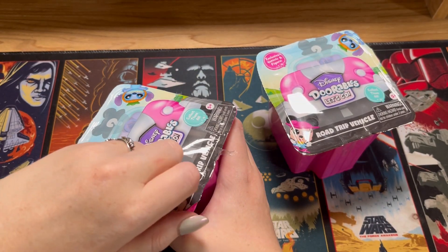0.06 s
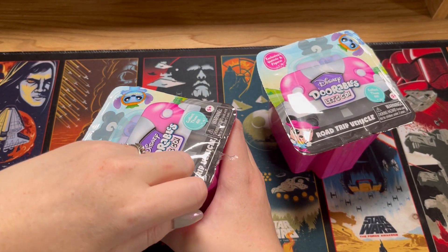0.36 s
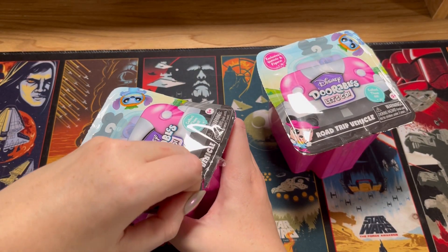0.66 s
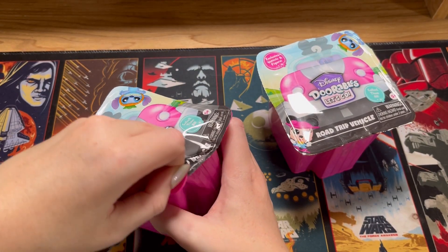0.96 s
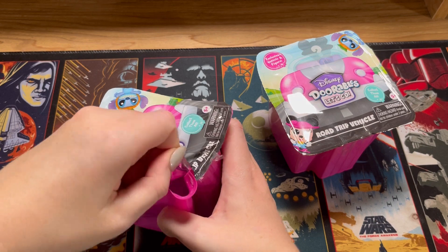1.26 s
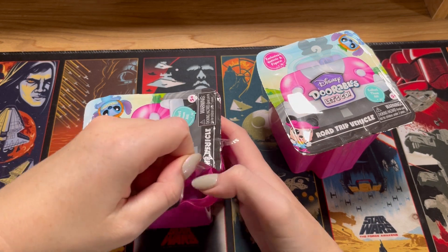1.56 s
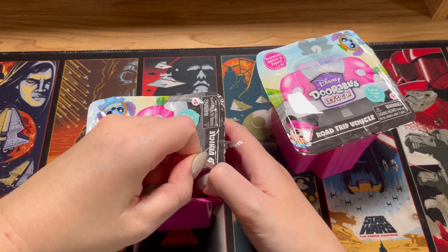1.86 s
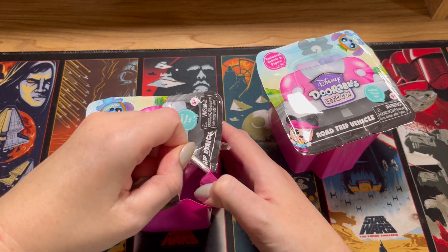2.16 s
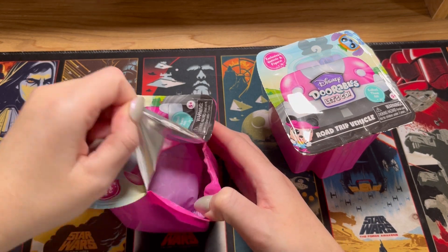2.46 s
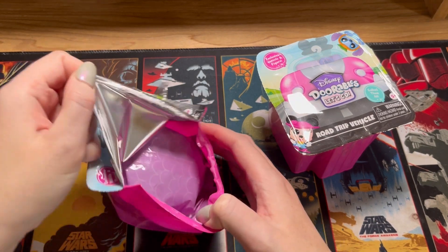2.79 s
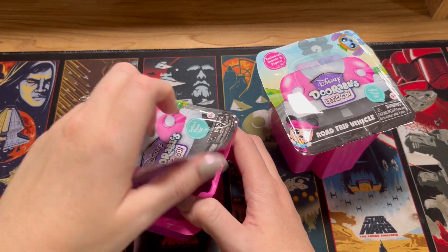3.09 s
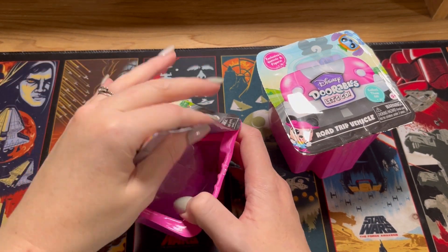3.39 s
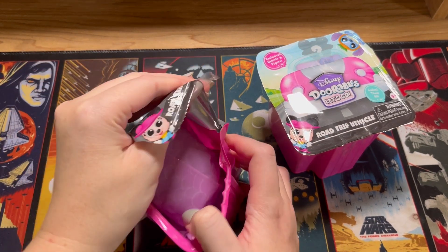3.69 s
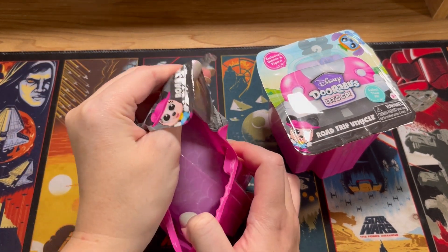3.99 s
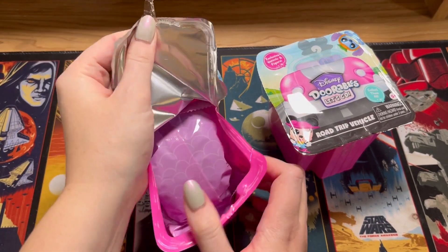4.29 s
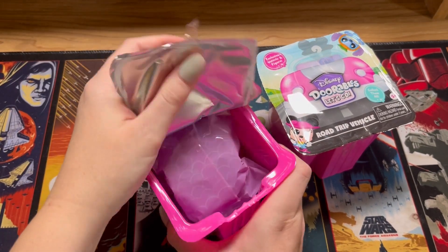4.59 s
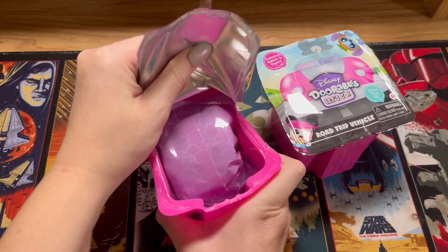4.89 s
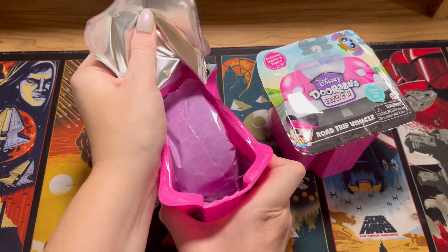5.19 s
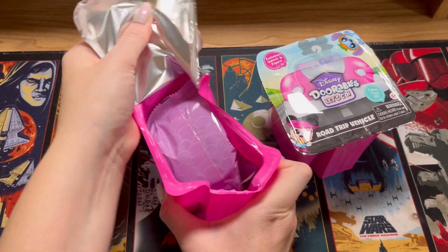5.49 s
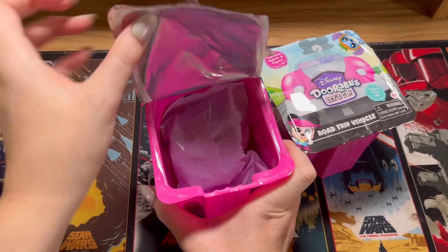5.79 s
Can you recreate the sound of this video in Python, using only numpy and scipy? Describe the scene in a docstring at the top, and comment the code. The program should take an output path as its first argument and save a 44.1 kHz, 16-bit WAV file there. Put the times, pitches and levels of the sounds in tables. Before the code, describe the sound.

Close to the microphone in a small dry room, a foil lid is peeled off a hand-held plastic tub. Light, scattered clicks come first, then the seal gives way in louder bursts of sharp, slightly hollow snaps. Between them the foil crinkles and the tub creaks, with soft low thumps and a faint rumble from the hands.

```python
"""A small dry room: close to the microphone, a foil lid is peeled off a hand-held plastic tub.
The seal lets go in jerks; each snap runs through the lid and the hollow tub.
In between, the bent foil crinkles and the tub creaks. The hands rumble on the plastic,
and the handled tub gives soft low thumps, some sounding under the snaps."""
import sys
import numpy as np
from scipy import signal
from scipy.fft import rfft, irfft, next_fast_len
from scipy.io import wavfile

SR = 44100
rng = np.random.default_rng(int(sys.argv[2]) if len(sys.argv) > 2 else 0)


def digitize_waveform(pressure):
    """Quantize a signal to 16-bit integers and store it at the path in sys.argv[1].

    Rows of a 2-D input are taken as channels; values are limited to [-1, 1].
    """
    field = np.atleast_2d(pressure).T
    bounded = np.clip(field, -1, 1)
    quanta = np.round(bounded * 32767).astype(np.int16)
    wavfile.write(sys.argv[1], SR, quanta)


N = 257984

# Snaps of the seal. Each row: start in seconds, knock level in dB over 10 ms, hollow in dB re knock,
# brightness in dB, ring pitch in Hz, length in ms.
SNAPS = [(0.1272, -36.5, -15, -13.5, 2090, 0.86), (0.2339, -41, -4.5, -18, 1960, 1.67),
         (0.3208, -43.5, -3, -9, 1860, 1.4), (0.4725, -47, -23, -26, 1310, 1.3),
         (0.501, -41, -6, -18, 520, 2.6), (0.5275, -30, -24, -14, 1690, 1.1),
         (0.577, -45, -7, 0.5, 1820, 1.4), (0.6632, -49, 7.5, -1.5, 603, 1.8),
         (0.8131, -52, -7, 9.5, 5000, 1.43), (0.843, -33.5, 4, -21, 767, 1.7),
         (0.86, -36.5, 5, -13, 554, 1.5), (0.9073, -38.5, -19, -8, 2030.0, 2.2),
         (0.932, -26, -12, -5, 1860.0, 1.7), (0.941, -29, -11, -16, 1850.0, 1.2),
         (0.9669, -29.5, -17, -5, 1800, 1.9), (1.0002, -34, 2.5, -7.5, 503, 2.1),
         (1.013, -30, 4.5, -1, 540, 1.9), (1.0739, -35.5, 2, -8.5, 301.0, 1.17),
         (1.114, -46, 13, 10.5, 5600, 1.46), (1.12, -36.5, 7, 5, 348, 2.6),
         (1.1376, -35.5, -7, 8, 5000, 1.2), (1.1462, -34, -1.5, -1, 1940, 2.5),
         (1.242, -35.5, 2, -8, 490, 2.1), (1.258, -38.5, -9, -7.5, 2120, 2),
         (1.366, -27, -16, -10.5, 2050, 1.9), (1.3715, -30, -8, -8.5, 1910, 2.6),
         (1.3996, -25.5, -11, 2.5, 4020, 1.02), (1.4304, -47.5, 13, -3, 590, 2.8),
         (1.4915, -28, -2.5, -13.5, 1940, 1.65), (1.6644, -50.0, -14, 4, 2780, 1.4),
         (1.7458, -45.5, -1.5, -14, 534, 1.15), (1.873, -33, -11.5, 7.5, 2210, 1.1),
         (1.8834, -38.0, -14, 5.5, 3040, 1.07), (1.9536, -33.5, -8, 6, 5400, 1.36),
         (2.094, -44.5, -9, -1.5, 2600, 1.9), (2.1538, -17, -6.5, -13.5, 720, 1.16),
         (2.1823, -22.0, -0.5, -2, 740, 1.9), (2.22, -42.5, 8, 10, 640, 1.1),
         (2.2346, -24, 0.5, -6, 2060, 2.46), (2.3791, -33, 11, -7, 594, 2.56),
         (2.3928, -23.0, -2, -16, 1300, 1.48), (2.397, -37.5, 8, 8, 564, 2),
         (2.429, -24.5, -5, -5, 2100, 2.6), (2.4455, -25, -5, -5, 543, 1.32),
         (2.4495, -24, 5.5, -10, 581.0, 1.6), (2.4573, -24.5, -0.5, -7, 594, 2.5),
         (2.4719, -25, 1.5, -11, 610, 2.1), (2.4919, -25.5, -3, -5, 574, 1.6),
         (2.5537, -29, 2.5, -0.5, 535, 2.35), (2.5635, -19.5, -4.5, -3.5, 2170, 1.8),
         (2.5745, -16.0, -12, -12, 1440, 2.15), (2.6145, -26.5, 7, 1.5, 530, 2.5),
         (2.6266, -33.5, 8, 4.5, 534, 1.9), (2.6572, -32.5, -14, 1.5, 1720, 1.4),
         (2.6904, -40.5, 10.5, -12, 560, 2.7), (2.7379, -33.5, -8.5, 11, 6160, 0.72),
         (2.8058, -40.5, 1.5, 5, 580, 1.24), (2.842, -40, -6, 6, 1730.0, 1.3),
         (2.8559, -31.5, -1, 2.5, 4950, 3.0), (2.8862, -27.5, -5, -1.5, 1750, 3.0),
         (2.8985, -27.5, -4, -3, 1240, 2.5), (2.9254, -23, -23, 1.5, 5270, 1.12),
         (2.9762, -26.5, -13, 4, 2360, 1.47), (3.0976, -34, -6, -6, 2660, 1.54),
         (3.1748, -53.5, 11.5, -13, 534, 2.6), (3.337, -41.5, -4, -12, 1650, 2.5),
         (3.3962, -35.0, -4, -5.5, 1860, 3.3), (3.4276, -41, 4.5, 5.5, 476, 1.8),
         (3.4613, -26, 0.5, 2, 586, 1.76), (3.4809, -26, -10, -11.5, 1360, 1.85),
         (3.56, -56, 4.5, 13, 6160, 1.3), (3.6275, -37.5, -11, 6, 4690.0, 2.1),
         (3.6402, -23.5, -8, -6, 1840, 1.7), (3.6678, -33, -8, -2, 1800, 1.57),
         (3.7122, -14, -7.5, -14, 1400, 2.05), (3.8393, -25, 2.5, 1.5, 640, 1.45),
         (3.983, -39, -3, -9, 574, 4.2), (3.998, -20.5, -7.5, -2, 1330, 2.3),
         (4.022, -16.5, -5.5, -10.5, 1244, 1.62), (4.0333, -22, -0.5, -2, 581.0, 2.7),
         (4.0437, -20.5, -3, 0.5, 3140.0, 2.1), (4.0533, -22.5, -1, -2, 470, 2.4),
         (4.076, -34.5, 5, 7, 484.0, 1.63), (4.1133, -36.5, 1.5, -4, 530, 2.7),
         (4.1629, -38, -2, 3, 4750.0, 1.12), (4.2802, -37.5, -18, -14, 3300, 0.79),
         (4.354, -37, 1.5, -7, 334.0, 2.2), (4.384, -35, -19, -8.5, 1460, 2.4),
         (4.4022, -33, -5, -2.5, 2140, 2.76), (4.537, -41.5, 5.5, -1, 488, 2),
         (4.6148, -36.5, 0, 6, 5840, 1.09), (4.771, -35, -14, -5, 2170, 2.3),
         (4.8044, -33.5, -1, -13, 520, 3.7), (4.8207, -30.5, 0, -3, 510, 1.75),
         (4.854, -28.5, -0.5, -0.5, 592.0, 1.01), (4.879, -28, -4, -3, 2690, 3.0),
         (4.9367, -32.5, -12, 2.5, 2280, 1.47), (4.9725, -32.5, -14, -9, 1830.0, 1.5),
         (5.0465, -32.5, 1, -5, 584, 2.5), (5.068, -30, -7, -8, 1750, 2), (5.091, -32, -8, 6, 1440, 1.1),
         (5.1039, -19, -1.5, -15, 624.0, 3.4), (5.1813, -27.5, -11, 0, 2330, 0.98),
         (5.1863, -21.5, -1.5, -3.5, 510, 2.3), (5.2024, -30.5, -16, 3, 6070.0, 1.24),
         (5.2281, -38.5, -22, 6, 6120.0, 1.0), (5.2634, -28.5, -5, 0, 2950, 3.0),
         (5.338, -38, -5, -1, 1940.0, 1.7), (5.392, -45.5, -11, -2, 1920.0, 3.0),
         (5.4292, -42.5, -27, -13, 2180, 1.46), (5.488, -33.5, -32, -10, 3300, 1.1),
         (5.5595, -35.0, -23, 4.5, 3700, 1.12), (5.6216, -40.5, -13, 5, 1150, 3.0),
         (5.6365, -32, -15, -8, 1160, 1.6), (5.6793, -33, -4, -0.5, 5640, 1.4),
         (5.7089, -24, -2.5, -0.5, 1514, 2.8), (5.78, -15.5, -0.5, -6.5, 556, 1.77)]


def from_db(db):
    return 10 ** (np.asarray(db) / 20)


def unit_rms(x):
    return x / np.sqrt(np.mean(x ** 2, axis=-1, keepdims=True) + 1e-20)


def per_bin(points, size):
    """Table columns interpolated over log frequency at each FFT bin."""
    hz, *columns = np.transpose(points)
    bins_hz = np.maximum(np.arange(size // 2 + 1) * SR / size, 1)
    return [np.interp(np.log(bins_hz), np.log(hz), column) for column in columns]


def coloured(x, spectrum):
    size = x.shape[-1]
    return irfft(rfft(x) * from_db(per_bin(spectrum, size)[0]), size)


def add(track, start_s, sound):
    at = int(np.clip(round(start_s * SR), 0, N - 1))
    track[at:at + len(sound)] += sound[:N - at]


def room_tone():
    """Quiet air: three independent noises."""
    # Air spectrum. Each row: frequency in Hz, relative density in dB.
    spectrum = [(20, -30.5), (60, 13), (120, -15), (250, -9.5), (550, -9), (1100, -22), (2000, -21.5),
                (5000, -35.5), (9000, -42), (16000, -58)]
    return from_db(-60) * unit_rms(coloured(rng.standard_normal((3, N)), spectrum))


def room_tail(x, build_s):
    """Each band stores the sound's power and lets it die, uncorrelated left and right."""
    # Room decay. Each row: band centre in Hz, return gain in dB, T60 in seconds.
    bands = [(150, -4, 0.19), (273, -14.5, 0.15), (549, -12, 0.14), (1200, -10, 0.16), (2360, -13, 0.13),
             (3960, -8.5, 0.17), (7500, -15.5, 0.033), (11200, -17, 0.17)]
    t = np.arange(SR // 3) / SR
    white = rng.standard_normal((2, 2, N))   # adjacent bands get different noise
    out = 0
    for k, (hz, return_db, t60_s) in enumerate(bands):
        octave = signal.butter(2, [hz / np.sqrt(2), hz * np.sqrt(2)], "band", fs=SR, output="sos")
        fade = (1 - np.exp(-t / build_s)) ** 4 * from_db(-60 * t / t60_s) ** 2
        power = signal.oaconvolve(signal.sosfilt(octave, x) ** 2, fade / fade.sum())[:N]
        noise = unit_rms(signal.sosfilt(octave, white[k % 2]))
        out = out + from_db(return_db) * np.sqrt(abs(power)) * noise
    return out


def mic_ports(x):
    """Near sound reaches the two ports with frequency-dependent level and phase differences."""
    # Port response. Each row: frequency in Hz, left minus right in dB, left phase lead in radians.
    response = [(150, 0, 0), (300, 2.4, .2), (550, 2.1, .4), (1000, 2.5, .3), (2000, 1.2, .75),
                (3100, 3.2, 1.2), (4800, 5.2, .1), (6200, 3.2, -1.3), (7200, .2, -2.1), (8400, 0, -3.14),
                (12000, 0, -6.3), (15000, 0, -9.1)]
    size = next_fast_len(N + SR // 10)
    left_db, lead_rad = per_bin(response, size)
    gains = from_db(np.array([left_db, -left_db]) / 2)
    gains = gains / np.sqrt(np.mean(gains ** 2, axis=0))
    phases = np.exp(.5j * np.array([lead_rad, -lead_rad]))
    return irfft(rfft(x, size) * gains * phases, size)[:, :N]


def hand_rumble(creak_envelope, grip_db=-61.5, strain_db=-48.5):
    """Hands on plastic: a steady grip, plus strain that grows with the bending."""
    # Rumble spectrum. Each row: frequency in Hz, relative density in dB.
    spectrum = [(20, -53), (45, -3.5), (68, -7.5), (120, -1.5), (200, -11), (400, -32.5), (1000, -40)]
    effort = creak_envelope / from_db(-40)
    envelope = np.hypot(from_db(grip_db), from_db(strain_db) * effort ** 0.72)
    return envelope * unit_rms(coloured(rng.standard_normal(N), spectrum))


def low_thumps(decay_cycles, rise_s):
    """Soft thumps of the handled tub, a few low cycles each, some under the snaps."""
    # Thumps. Each row: start in seconds, gain in dB, pitch in Hz.
    thumps = [(0.859, -39, 82), (1.003, -19.5, 219), (1.059, -19, 192), (1.074, -11, 79),
              (1.229, -37.5, 59), (1.503, -32.5, 88), (1.78, -35.5, 110), (2.183, -27.5, 135),
              (2.24, -29, 86), (2.449, -22.5, 112), (2.564, -21.5, 190), (2.619, -21.5, 120),
              (2.707, -30, 80), (2.89, -29, 190), (2.98, -33, 185), (3.139, -33, 99), (3.221, -33, 66.5),
              (3.731, -35, 100), (3.847, -18.5, 215), (4.047, -20, 110), (4.131, -31, 59),
              (4.355, -31.5, 220), (4.562, -34.5, 77), (5.062, -31.5, 187), (5.186, -26, 155),
              (5.716, -30.5, 86)]
    out, t = np.zeros(N), np.arange(SR // 5) / SR
    for start_s, gain_db, hz in thumps:
        envelope = (1 - np.exp(-t / rise_s)) * np.exp(-t * hz / decay_cycles)
        add(out, start_s, from_db(gain_db) * envelope * np.sin(2 * np.pi * hz * t))
    return out


def tub_body(x):
    """The hollow tub colours and prolongs sound at its resonances."""
    # Resonances. Each row: centre in Hz, width in Hz, gain in dB.
    modes = [(342, 40, -1), (564, 81, 7), (1218, 250, 3), (1792, 36, 7.5), (2130, 200, 2.5), (3170, 330, 4),
             (4650, 40, -1)]
    for hz, width_hz, gain_db in modes:
        resonance = signal.lfilter(*signal.iirpeak(hz, hz / width_hz, fs=SR), x)
        x = x + (from_db(gain_db) - 1) * resonance
    return x


def pull_swell(hold_s, lead_s, rise_db_per_s=1503, fall_db_per_s=452):
    """Gain of one pull: build up, hold, let go."""
    t = np.arange(int((lead_s + hold_s) * SR) + SR // 5) / SR - lead_s
    return from_db(-rise_db_per_s * np.maximum(-t, 0) - fall_db_per_s * np.maximum(t - hold_s, 0))


def bending_envelopes(lead_s=.02, settle_db_per_s=399.5):
    """Creak and crinkle amplitudes: resting fingers, pulls, creases settling after each snap."""
    # Pulls on the lid. Each row: start in seconds, hold in seconds, creak in dB, crinkle in dB re creak.
    pulls = [(0.023, 0.019, -52.5, -9), (0.506, 0.011, -42.5, -25), (0.708, 0.063, -60, -25),
             (0.865, 0.14, -47, 1), (1.119, 0.016, -38, 2.5), (1.194, 0.046, -45.5, -8.5),
             (1.347, 0.12, -45.5, -18.5), (1.651, 0.011, -61, 9.5), (1.769, 0.027, -56, -31),
             (2.159, 0.064, -31.5, -11), (2.372, 0.12, -32, -7.5), (2.553, 0.079, -32, -16),
             (2.657, 0.23, -51.5, -11), (2.813, 0.18, -39.5, -7.5), (3.012, 0.051, -44, -8),
             (3.16, 0.11, -60.5, -6), (3.342, .09, -48, -13), (3.451, 0.026, -37.5, -9),
             (3.594, 0.19, -47.5, -13), (4.022, 0.038, -26, -1), (4.068, 0.074, -40.5, -8.5),
             (4.261, 0.16, -45, -5.5), (4.43, 0.11, -57.5, 3.5), (4.537, 0.12, -45, -6.5),
             (4.729, 0.35, -46, -7), (4.8, 0.12, -39.5, -18), (5.053, 0.19, -36, -0.5),
             (5.274, 0.12, -46.5, -4), (5.447, 0.087, -57, -5), (5.514, 0.085, -43.5, -2),
             (5.624, .1, -36.5, -2), (5.743, 0.073, -42, -2)]
    creak_power = np.full(N, from_db(-71) ** 2)   # resting fingers
    crinkle_power = np.full(N, from_db(-85.5) ** 2)
    for start_s, hold_s, creak_db, crinkle_db in pulls:
        power = (from_db(creak_db) * pull_swell(hold_s, lead_s)) ** 2
        add(creak_power, start_s - lead_s, power)
        add(crinkle_power, start_s - lead_s, power * from_db(crinkle_db) ** 2)
    settling = from_db(-settle_db_per_s * np.arange(SR // 5) / SR) ** 2
    for start_s, knock_db, _, bright_db, _, _ in SNAPS:
        add(creak_power, start_s, from_db(knock_db - 17.5) ** 2 * settling)
        add(crinkle_power, start_s, from_db(knock_db + bright_db - 16.5) ** 2 * settling)
    return np.sqrt(creak_power), np.sqrt(crinkle_power)


def crackle(flips_per_s, grain_ms, rub):
    """Tiny creases flip at random, each a short noise burst, over a little smooth rubbing."""
    sizes = from_db(4.5 * np.minimum(rng.exponential(1, N), 2.8))
    flips = (rng.random(N) < flips_per_s / SR) * sizes ** 2
    power = signal.lfilter([1], [1, -np.exp(-2000 / (grain_ms * SR))], flips + 1e-18)
    return unit_rms(np.sqrt(power / power.mean() + rub) * rng.standard_normal(N))


def lid_flex(creak_envelope, crinkle_envelope):
    """The bending foil crinkles brightly and makes the tub creak."""
    # Creak and crinkle spectra. Each row: frequency in Hz, relative density in dB.
    creak_spectrum = [(120, -31), (300, 0.5), (550, -4), (900, -7.5), (2200, -9.5), (3500, -18.5),
                      (7000, -43.5)]
    crinkle_spectrum = [(1000, -31.5), (2600, 5), (4500, 2), (7000, 4), (10000, 3), (14000, -8.5),
                        (16000, -22)]
    creak = unit_rms(tub_body(coloured(crackle(flips_per_s=150, grain_ms=3, rub=.08), creak_spectrum)))
    crinkle = unit_rms(coloured(crackle(flips_per_s=170, grain_ms=1.3, rub=.1), crinkle_spectrum))
    return from_db(0.5) * creak * creak_envelope + from_db(2) * crinkle * crinkle_envelope


def seal_snaps(ring_db, ring_lengths, front_db, travel_lengths, size=2048):
    """Each snap is a wave front and its dying scatter in thin plastic; highs come first, lows last."""
    # Hollow, knock, crack and tick bands. Each row: low edge in Hz, high edge in Hz, rise in ms,
    # decay in snap lengths, trim in dB.
    registers = [(242, 705, 2.3, 2.14, 0), (947, 2844, 0.62, 1.78, 0), (2500, 7900, 0.2, 1.5, -1),
                 (6830, 12860, 0.071, 1.22, -0.5)]
    starts_s, knock_db, hollow_db, bright_db, ring_hz, length_ms = np.transpose(SNAPS)[:, :, None]
    crack_db, tick_db = 1.4 + bright_db, -1.6 + 1.4 * bright_db
    t, hz = np.arange(size) / SR, np.arange(size // 2 + 1) * SR / size
    t_ms = t * 1000
    scatter = rng.standard_normal((len(SNAPS), len(registers), size))
    # Bending-wave speed goes as the root of frequency: the front is a falling chirp.
    delay_1khz_s = travel_lengths * length_ms / 1000
    front = unit_rms(irfft(np.exp(-4j * np.pi * delay_1khz_s * np.sqrt(1000 * hz)), size))
    # The patch of lid that gives way rings; higher pitches die sooner.
    ring_ms = ring_lengths * length_ms * np.sqrt(1000 / ring_hz)
    ring_decay = np.exp(-t_ms / ring_ms)
    ring = unit_rms(np.sin(2 * np.pi * ring_hz * t) * (1 - ring_decay) * ring_decay)
    snaps = 0
    for k, colour_db in enumerate((hollow_db, 0, crack_db, tick_db)):
        low_hz, high_hz, rise_ms, decay_lengths, trim_db = registers[k]
        band = signal.butter(3, [low_hz, high_hz], "band", fs=SR, output="sos")
        envelope = (1 - np.exp(-t_ms / rise_ms)) ** 2 * np.exp(-t_ms / (decay_lengths * length_ms))
        waves = unit_rms(scatter[:, k] * envelope) + from_db(front_db) / length_ms * front
        waves = unit_rms(signal.sosfilt(band, tub_body(waves)))
        waves = waves + from_db(ring_db) * signal.sosfilt(band, ring)
        snaps = snaps + unit_rms(waves) * from_db(knock_db + colour_db + trim_db)
    snaps = snaps * np.sqrt(.01 * SR / size)   # energy referred to 10 ms
    out = np.zeros(N)
    for start_s, snap in zip(starts_s[:, 0], snaps):
        add(out, start_s, snap)
    return out


def scene():
    """Lid and tub close to the two ports, with room tail and quiet air."""
    creak_envelope, crinkle_envelope = bending_envelopes()
    snaps = seal_snaps(ring_db=1.5, ring_lengths=1.25, front_db=-3.5, travel_lengths=0.702)
    direct = snaps + lid_flex(creak_envelope, crinkle_envelope)
    # Part of each snap leaves sideways and reaches the ports in opposite phase.
    sideways = seal_snaps(ring_db=-9, ring_lengths=1.2, front_db=-8.5, travel_lengths=0.91)
    sideways = from_db(-12) * sideways * np.array([[1], [-1]])
    low = low_thumps(decay_cycles=1.28, rise_s=0.0012) + hand_rumble(creak_envelope)
    air = room_tone()
    tail = room_tail(direct, build_s=0.00022) * from_db([[.6], [-.6]])
    return mic_ports(direct + low + air[2]) + sideways + tail + from_db(-5.5) * air[:2]


def record(dry):
    """Microphone: bass cut, clipping at full scale, steep top cut."""
    bass_cut = signal.butter(2, 42, "high", fs=SR, output="sos")
    top_cut = signal.butter(12, 16300, fs=SR, output="sos")
    clipped = np.clip(signal.sosfilt(bass_cut, dry), -1, 1)
    return signal.sosfiltfilt(top_cut, clipped)


dry = scene()
out = record(dry)
digitize_waveform(out)
```